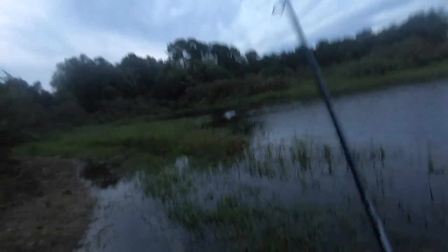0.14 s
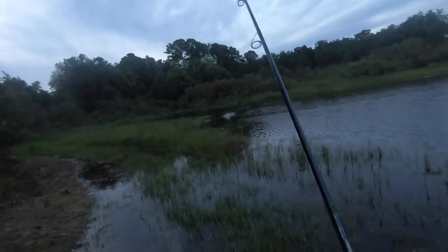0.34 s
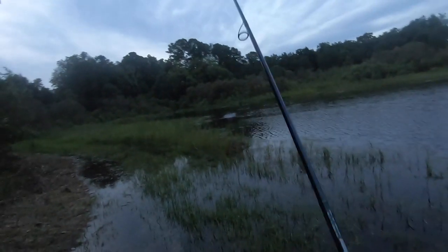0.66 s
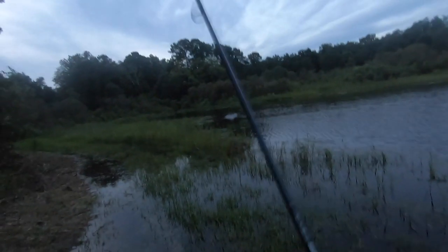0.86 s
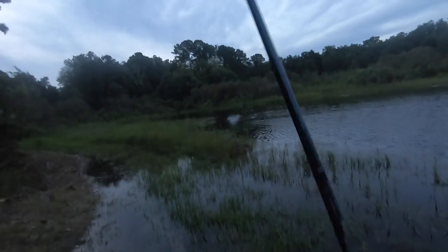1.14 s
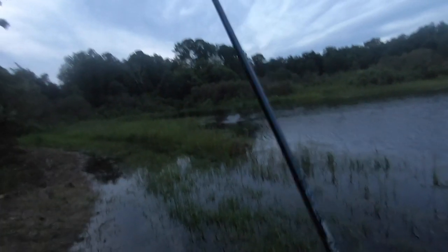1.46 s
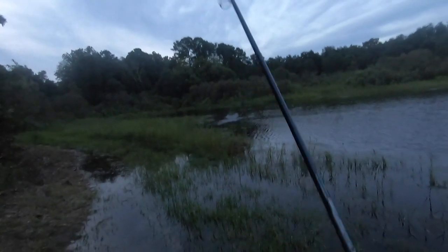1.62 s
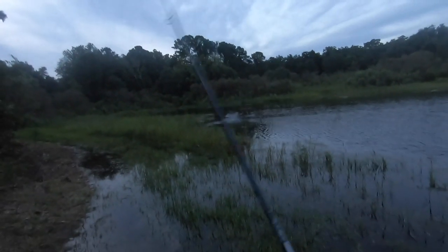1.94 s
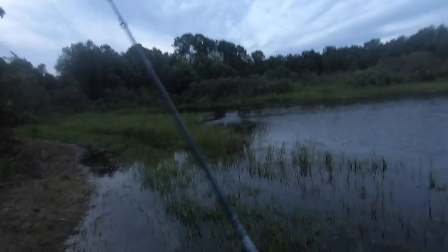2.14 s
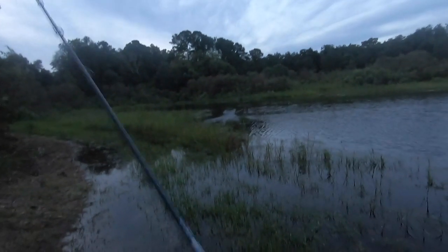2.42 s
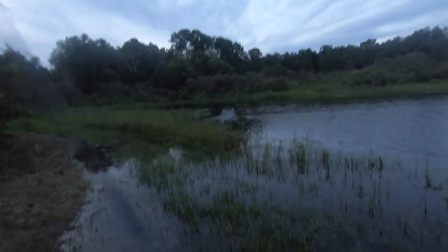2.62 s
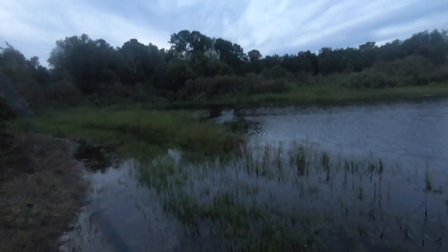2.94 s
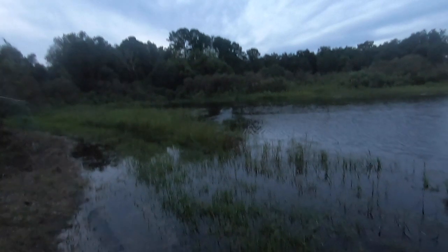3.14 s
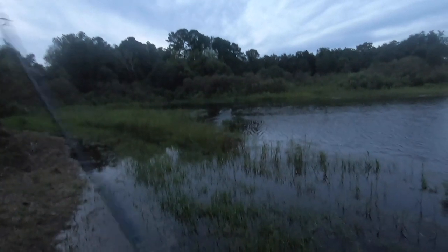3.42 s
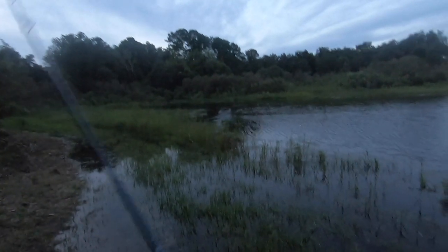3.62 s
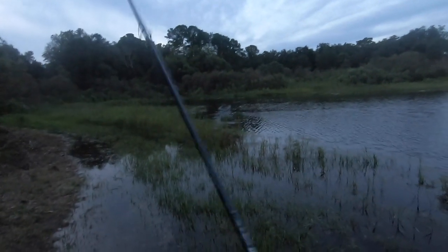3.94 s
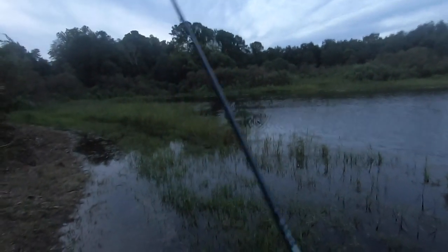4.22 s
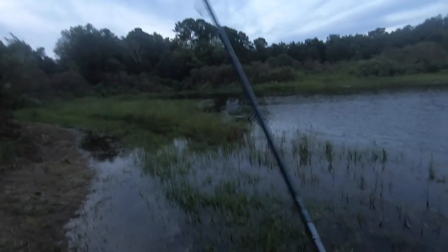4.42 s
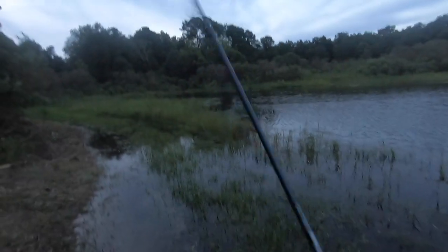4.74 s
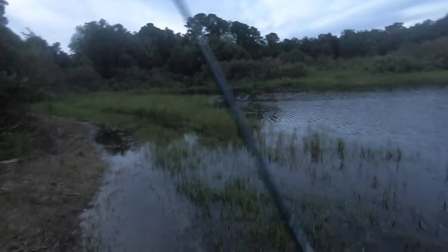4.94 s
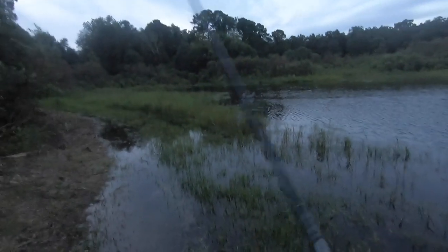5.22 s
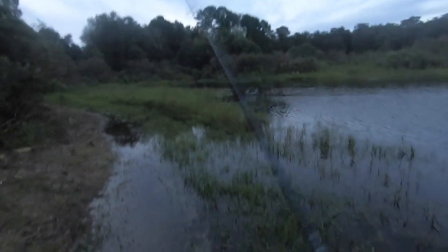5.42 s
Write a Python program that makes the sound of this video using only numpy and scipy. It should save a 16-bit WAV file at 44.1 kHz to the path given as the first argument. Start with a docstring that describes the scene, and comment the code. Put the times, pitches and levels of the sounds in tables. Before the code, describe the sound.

Squeaky, raspy reel cranking on a quiet pond bank, with katydids shimmering far off and low breeze thumping the microphone mostly at left.

```python
"""A fishing reel is wound on a pond bank at dusk: meshing gears whine in chirps that follow the crank.
Teeth and line add a rasp of noise through the same modes; the tackle ticks and the grip rustles, as shaped noise.
A light breeze rumbles, mostly at the left of two microphone ports, as low noise with gusts and single thumps.
Behind lie a far chorus of katydids near 9 kHz (noise pulsed by wing strokes), a swelling wash to the right
and the soft hush of the open shore (both filtered noise)."""
import sys
import numpy as np
from scipy import signal
from scipy.fft import rfft, irfft
from scipy.io import wavfile

SR = 44100
rng = np.random.default_rng(int(sys.argv[2]) if len(sys.argv) > 2 else 0)


def to_wav(sig):
    """Store sig (one row per channel, or 1-D mono) as 16-bit WAV at the path in sys.argv[1].

    Samples outside -1..1 are clipped; the rate is SR.
    """
    pcm = np.clip(np.atleast_2d(sig), -1, 1) * 32767
    pcm = np.round(pcm).astype(np.int16)
    wavfile.write(sys.argv[1], SR, pcm.T)  # frames by channels


N = 245637
TIME = np.arange(N) / SR  # s
BINS = np.fft.rfftfreq(N, 1 / SR)  # Hz


def undb(db):
    """Decibel law: amplitude gain is 10 to the power of level / 20."""
    return 10 ** (np.asarray(db) / 20)


def unit(x):
    """Normalisation of power: scale to an rms of one."""
    return x / np.sqrt(np.mean(x ** 2))


def level_curve(table):
    """Linear interpolation in time: a level [dB] for every sample."""
    s, db = np.transpose(table)
    return np.interp(TIME, s, db)


def spectra(table):
    """Interpolation on a logarithmic frequency axis: each column of the table, bin by bin."""
    hz, *columns = np.transpose(table)
    return [np.interp(np.log(BINS + 1), np.log(hz), column) for column in columns]


def shape(x, response):
    """Linear filtering: multiply the spectrum by a frequency response."""
    return irfft(rfft(x) * response, N)


def resonance(hz, width):
    """Simple resonator: the response of one mode [Hz, width Hz], gain 1 at its centre."""
    return 1j * BINS * width / (hz ** 2 - BINS ** 2 + 1j * BINS * width)


def walk(rate):
    """Low-passed Gaussian noise: a smooth chance of rms 1 that changes about rate times a second."""
    smoothing = np.exp(-(BINS / rate) ** 2)
    return unit(shape(rng.standard_normal(N), smoothing))


def noise_pair(likeness):
    """Mid-side mixing: left and right white noise with a given correlation, per bin if it is an array."""
    correlation = np.clip(likeness, -.99, .99)
    mid = shape(rng.standard_normal(N), np.sqrt(1 + correlation))
    side = shape(rng.standard_normal(N), np.sqrt(1 - correlation))
    return unit(np.array([mid + side, mid - side]))


def pan(db):
    """Constant-power panning: gains of the two ports for a left minus right level."""
    left_right_db = np.array([[db], [-db]]) / 2
    return unit(undb(left_right_db))


def swelling(events, rests_db):
    """Addition of powers: bell-shaped swells over a steady rest, returned in dB for each level column."""
    s, half, *columns = np.transpose(events)
    bells = np.exp(-((TIME - s[:, None]) / half[:, None]) ** 2)
    swell_power = undb(columns) ** 2 @ bells
    rest_power = undb(rests_db).reshape(-1, 1) ** 2
    return 10 * np.log10(swell_power + rest_power)


# Hush of the shore: (frequency [Hz], relative left level [dB], relative right level [dB],
# correlation of the two ports [0-1])
SHORE_SPECTRUM = [(60, -23, -7, 0.3), (232, 5.5, 5.5, 1), (393, -14.5, -8.5, 1), (650, -1.5, 2.5, 0.9),
                  (860, 0, -7, 0), (1090, -1, 6.5, 0.52), (1640, -9, -3.5, 0), (2220, -6, -6, 0.2),
                  (3480, -9, -8.5, 1), (4960, -2, 0, 0.32), (6220, -19, -15, 0), (7460, -11.5, -6, 0),
                  (11900, -15.5, -16, 0.6), (15100, -16.5, -18, 0)]


def shore(level_db=-44, flicker_db=2.44):
    """Diffuse field: far trees, water and small insects blend to a hush whose lower part flickers."""
    left_db, right_db, likeness = spectra(SHORE_SPECTRUM)
    hush = unit(shape(noise_pair(likeness), undb([left_db, right_db])))
    low = shape(hush, 1 / (1 + (BINS / 1600) ** 4))
    high = hush - low
    return (high + low * undb(flicker_db * walk(35))) * undb(level_db)


# Spectrum of the far wash: (frequency [Hz], relative level [dB])
WASH_SPECTRUM = [(480, -48), (650, -9.5), (770, 2.5), (1050, -2), (1200, -14), (1500, -19), (2100, -36)]
# Swells of the wash: (time [s], half length [s], level before panning [dB])
WASH_SWELLS = [(0, 0.2, -45.5), (1.29, .14, -46.5), (1.8, .1, -47.5), (2.53, .22, -55), (3.22, .15, -45.5),
               (3.62, 0.21, -43), (4.28, 0.095, -47.5), (4.95, 0.23, -45.5), (5.55, 0.32, -42.5)]


def wash(rest_db=-53):
    """Varying propagation: a distant wash, perhaps tyres on a road, swells as air carries it over the pond."""
    sound = unit(shape(noise_pair(0.68), undb(spectra(WASH_SPECTRUM)[0])))
    return sound * undb(swelling(WASH_SWELLS, rest_db)) * pan(-15.0)


# Spectrum of the katydid song: (frequency [Hz], relative level [dB])
SONG_SPECTRUM = [(6500, -22.5), (7800, -17.5), (8400, -8.5), (9050, -2), (9550, -1.5), (10050, -5),
                 (10600, -11), (11300, -22.5), (13000, -31)]


def katydids(count=8, stroke_hz=130, depth=0.14, lag_us=34, spread_us=25.5, level_db=-38, waver_db=0.77):
    """Stridulation: each singer scrapes its wings at its own rate, placed by the time lag between the ports."""
    song = undb(spectra(SONG_SPECTRUM)[0])
    chorus = 0
    for place in np.linspace(-1, 1, count):
        rate = stroke_hz * np.exp(.35 * rng.standard_normal() + 0.0308 * walk(3.39))
        strokes = 1 + depth * np.sin(2 * np.pi * np.cumsum(rate) / SR)
        scrape = rng.standard_normal(N) * strokes * undb(1.5 * walk(3.5))
        left_lag = (lag_us + spread_us * place) / 10 ** 6  # s
        arrivals = np.array([np.exp(-2j * np.pi * BINS * left_lag), np.ones(len(BINS))])
        chorus = chorus + shape(scrape, song * arrivals)
    return unit(chorus) * undb(level_db + waver_db * walk(1)) * pan(-0.21)


# Spectrum of the breeze: (frequency [Hz], relative level [dB])
BREEZE_SPECTRUM = [(15, -14), (28, -0.5), (45, 2), (75, 0), (110, -3), (160, -14.5), (250, -32), (400, -28),
                   (900, -66)]
# Gusts on the ports: (time [s], half length [s], left level [dB], right level [dB],
# level of fine eddies at the left port [dB])
PORT_GUSTS = [(0.058, .1, -31, -39, -42.5), (0.273, 0.11, -31, -43, -57), (.63, 0.14, -30.5, -39.5, -59),
              (1.862, .13, -26.5, -42, -42), (2.18, 0.17, -25, -53, -44), (2.67, 0.39, -30, -42, -56),
              (3.43, 0.11, -30, -35, -47), (3.68, 0.15, -23, -28, -34.5), (3.924, 0.16, -19.5, -35, -30),
              (4.28, 0.24, -25.5, -44, -36.5), (4.61, 0.26, -31.5, -42, -42),
              (5.28, 0.25, -28.5, -41, -44.5)]
# Light air between the gusts: (left level [dB], right level [dB], level of fine eddies at the left port [dB])
CALM_LEVELS = [-39, -41.5, -60]


def breeze(buffet_db=2, fine_right_db=-12):
    """Turbulence: eddies buffet each port on its own; gusts shed finer eddies that reach higher in pitch."""
    left_db, right_db, fine_db = swelling(PORT_GUSTS, CALM_LEVELS)
    eddies = unit(shape(noise_pair(0), undb(spectra(BREEZE_SPECTRUM)[0])))
    fine = unit(shape(noise_pair(0), resonance(148, 110) ** 2))
    rumble = eddies * undb([left_db, right_db]) + fine * undb([fine_db, fine_db + fine_right_db])
    return rumble * unit(undb(buffet_db * walk(36)))


# Single eddies that thump the left port: (time [s], peak of the envelope [dB], pitch [Hz])
EDDY_THUMPS = [(0.07, -15.5, 76), (.268, -19, 47.4), (1.877, -12, 71.6), (2.112, -17, 60),
               (2.421, -16.5, 63.6), (3.405, -20, 59.5), (3.659, -8.5, 55), (3.928, -9.5, 71.4),
               (4.26, -10.5, 72), (4.512, -12, 77), (4.655, -16, 85), (5.19, -18.5, 50.7)]


def thumps(cycles=0.49, right_db=-18):
    """Pressure pulse: a large eddy pushes and pulls on the port about once, fainter at the right."""
    out = 0
    for s, db, hz in EDDY_THUMPS:
        turns = (TIME - s) * hz
        envelope = np.exp(-(turns / cycles) ** 2)
        out = out + undb(db) * envelope * np.sin(2 * np.pi * (turns + rng.random()))
    return out * undb([[0], [right_db]])


# Soft low rustle of hands on the rod: (time [s], level [dB])
GRIP_LEVEL = [(0, -53.5), (1.6, -55.5), (3, -63), (5.57, -66)]


def grip(hz=380, width_hz=450, patchy_db=4.5):
    """Friction noise: hands and sleeves shift on the rod with a dull, patchy rustle."""
    rub = unit(shape(noise_pair(0.78), resonance(hz, width_hz) ** 2))
    return rub * undb(level_curve(GRIP_LEVEL) + patchy_db * walk(15))


# Ticks and rattles of the tackle: (time [s], level before panning [dB], ring frequency [Hz],
# decay time of the contact [s])
TACKLE_TICKS = [(0.035, -35.5, 1750, 0.0085), (.124, -35, 2880, 0.018), (0.14, -30, 2540, 0.011),
                (.349, -36, 3180, 0.018), (0.425, -37.5, 3087, 0.017), (1.221, -39.5, 855, 0.013),
                (2.856, -38, 1710, 0.0082), (3.6243, -22, 3370, 0.0014)]


def ticks(width_hz=1700, rod_hz=900, rod_width_hz=1050, rod_db=-9):
    """Impact excitation: each decaying burst of contact noise rings the reel and, more dully, the rod."""
    rod = undb(rod_db) * resonance(rod_hz, rod_width_hz) ** 2
    out = 0
    for s, db, hz, decay in TACKLE_TICKS:
        ring = resonance(hz, width_hz) ** 2 + rod
        ring = ring / np.sqrt(np.mean(np.abs(ring) ** 2))
        contact = rng.standard_normal(N) * (TIME >= s) * np.exp(-np.abs(TIME - s) / decay)
        out = out + undb(db) * shape(contact, ring)
    return out * pan(-9.0)


# Modes of reel and rod: (frequency [Hz], width [Hz], relative level at the left port [dB],
# relative level at the right port [dB])
BODY_MODES = [(1314, 45, -7, 14.5), (1545, 120, 0.5, -2.5), (1657, 53, 4.5, 6), (1945, 57, 11, -26),
              (2030, 26, 14.5, 4), (2142, 70, -7, 13.5), (2403, 78, -26, 6.5), (2565, 54, -17, -11.5),
              (2950, 100, -6, 2), (3073, 67, 3, 7), (3235, 34, 6, 14.5), (3434, 73, 8.5, -2.5),
              (3647, 28, -5, 11.5), (3750, 13, 4, -29), (5010, 210, 3.5, 8.5), (5450, 32, -11, 11.5),
              (6510, 200, 6, -39)]


def body(direct_db=-7, modes_db=-3.0, scatter_db=-6, scatter_s=0.016, twist=0.59):
    """Modal superposition: a direct path, the modes, and a short scatter off arms and ground, at each port."""
    modes = 0
    for k, (hz, width, left, right) in enumerate(BODY_MODES):
        # each mode radiates in its own pattern, so it reaches the two ports out of step (twist in radians)
        step = np.exp(1j * twist * (-1) ** k * np.array([[1], [-1]]))
        modes = modes + step * undb([[left], [right]]) * resonance(hz, width)
    tail = rng.standard_normal((2, N)) * np.exp(-TIME / scatter_s)
    scatter = rfft(unit(tail)) / np.sqrt(N)
    paths = undb(direct_db) + undb(modes_db) * modes + undb(scatter_db) * scatter
    return paths / (1 + (BINS / 8000) ** 8)  # gears give little above 8 kHz


# Pushes of the crank: (time [s], top mesh rate [Hz], length of the slackening [s], lowest mesh rate [Hz])
CRANK_PUSHES = [(0, 2940, .12, 1580), (.19, 1950, .035, 1600), (.31, 2600, .055, 1850),
                (.41, 2060, .055, 1400), (.59, 2500, .065, 1400), (.725, 1820, .11, 1300),
                (.92, 2700, .09, 1620), (1.11, 2080, .05, 1640), (1.245, 2500, .04, 1850),
                (1.36, 2650, .07, 1650), (1.54, 2500, .13, 1600), (1.755, 2800, .055, 1930),
                (1.86, 2050, .08, 1600), (2.02, 2950, .09, 2000), (2.17, 2060, .05, 1650),
                (2.32, 3000, .155, 1950), (2.56, 2700, .055, 2280), (2.68, 2950, .1, 2150),
                (2.915, 3100, .07, 1850), (3.175, 2700, .055, 1900), (3.31, 2000, .1, 1900),
                (3.45, 2650, .08, 1420), (3.61, 1930, .06, 1400), (3.74, 1850, .1, 1260),
                (3.935, 2080, .07, 1530), (4.085, 2050, .1, 1280), (4.27, 2030, .07, 1560),
                (4.43, 2450, .065, 1500), (4.585, 2470, .05, 1750), (4.71, 2350, .075, 1450),
                (4.87, 2170, .06, 2000), (4.995, 2470, .075, 1600), (5.14, 2400, .065, 1850),
                (5.26, 2300, .075, 1380), (5.43, 2300, .05, 1620), (5.53, 2150, .04, 1550)]


def crank(linger=.25):
    """Kinematics of the drive: each push speeds the mesh rate to a peak, then it slackens and lingers."""
    s, top_hz, slack_s, low_hz = np.transpose(CRANK_PUSHES)
    turns_s = np.column_stack([s, s + slack_s]).ravel()
    turns_hz = np.column_stack([top_hz, low_hz]).ravel()
    count = np.arange(len(turns_s))
    turn = np.interp(TIME, turns_s, count)
    # even turns are peaks and odd ones are lows: pass the peaks quickly and the lows slowly
    eased = turn + linger * np.sin(np.pi * turn) / np.pi
    return np.interp(eased, count, turns_hz)


# Dry rasp of the gear teeth: (time [s], level [dB])
RASP_LEVEL = [(0, -46), (.14, -44.5), (.74, -50), (1.4, -49), (1.9, -50), (2.8, -54.5), (3.25, -51),
              (3.6, -54.5), (4.1, -48), (4.9, -49.5), (5.57, -51.5)]
# Its spectrum ahead of the modes: (frequency [Hz], relative level [dB])
RASP_SPECTRUM = [(1200, -12), (1700, -46), (2200, -4.5), (2700, 10), (3200, 8), (4000, -6.5), (5000, -8),
                 (6200, -24), (9000, -12)]


def rasp(speed_db=2):
    """Stick-slip friction: teeth and line rub as noise in the same modes, a little louder at a fast crank."""
    octaves = np.log2(crank() / 2000)
    grains = rng.standard_normal(N) * undb(4.8 * walk(17) + speed_db * octaves)
    rub = unit(shape(grains, undb(spectra(RASP_SPECTRUM)[0]) * body()))
    return rub * undb(level_curve(RASP_LEVEL))


# Chirps, where the teeth bite under load; levels ahead of the modes: (time [s], half length [s],
# mesh tone [dB], its octave [dB], each higher overtone [dB])
GEAR_CHIRPS = [(.01, 0.022, -45, -45, -54), (.112, 0.019, -43, -42, -50), (.188, 0.027, -46.5, -41, -49),
               (.274, 0.02, -49.5, -45, -54), (.414, 0.023, -49, -39, -55), (.518, 0.06, -57, -52, -59),
               (.592, 0.028, -48, -45, -51), (.722, 0.059, -47.5, -45, -50.5), (.815, 0.028, -43, -48, -54),
               (.89, .03, -47, -47.5, -57), (1.092, 0.026, -37.5, -44, -50), (1.32, 0.016, -40, -50, -61),
               (1.422, .025, -42, -47.5, -53), (1.602, 0.051, -45.5, -54, -57),
               (1.672, .024, -45.5, -41, -56), (1.718, 0.014, -42.5, -48, -60),
               (1.89, .05, -46.5, -43, -51), (2.06, 0.066, -48.5, -55, -59), (2.175, 0.031, -41, -43, -58),
               (2.288, 0.014, -46.5, -56, -64), (2.44, 0.045, -48.5, -49, -60),
               (2.602, 0.016, -46.5, -55, -62), (2.726, 0.013, -37, -52, -57),
               (2.958, 0.032, -44.5, -49, -60), (3.216, .022, -43, -51, -63),
               (3.404, 0.016, -41.5, -55, -62), (3.532, 0.038, -46, -53, -64), (3.6, .05, -55, -58, -62),
               (3.746, 0.018, -47, -45, -59), (3.836, 0.043, -44.5, -50, -58),
               (3.946, 0.027, -45, -48, -53), (4.085, 0.041, -47.5, -42.5, -53),
               (4.28, 0.067, -49, -47.5, -63), (4.478, 0.051, -46, -46.5, -55),
               (4.755, 0.058, -45.5, -50.5, -57), (5.02, 0.039, -43.5, -47.5, -56),
               (5.272, .04, -44.5, -48, -57), (5.452, 0.033, -49, -45, -61), (5.548, .03, -48, -44, -57)]
# Whine between the chirps, ahead of the modes: (mesh tone [dB], octave [dB], each higher overtone [dB])
WHINE_LEVELS = [-55.5, -57.5, -68]


def reel(speed_db=1):
    """Gear meshing and resonance: harmonics follow the crank and flare when they sweep through a mode."""
    hz = crank()
    tone_db, octave_db, upper_db = swelling(GEAR_CHIRPS, WHINE_LEVELS)
    # uneven teeth shake the pitch quickly, the unsteady hand more slowly
    unsteady = .028 * walk(450) + .028 * walk(60)
    phase = 2 * np.pi * np.cumsum(hz * (1 + unsteady)) / SR
    whine = 0
    for k, db in enumerate([tone_db, octave_db, upper_db, upper_db], 1):
        contact_db = (3 + .5 * k) * walk(70) + 2 * walk(300)
        harmonic = np.sqrt(2) * np.sin(k * phase)
        whine = whine + harmonic * undb(db) * unit(undb(contact_db))
    # faster teeth strike harder
    strike = undb(speed_db * np.log2(hz / hz.mean()))
    return shape(whine * strike, body())


def scene():
    """Superposition: shore, wash and insects far off, the breeze on the ports, the tackle close by."""
    background = shore() + wash() + katydids()
    wind = breeze() + thumps()
    tackle = grip() + ticks() + rasp() + reel()
    return background + wind + tackle


def record(dry):
    """Band limiting: a steep elliptic low-pass cuts the top above 15 kHz."""
    low_pass = signal.ellip(8, .2, 70, 15000, fs=SR, output="sos")  # order, ripple dB, stopband dB, Hz
    return signal.sosfilt(low_pass, dry)


dry = scene()
out = record(dry)
to_wav(out)
```